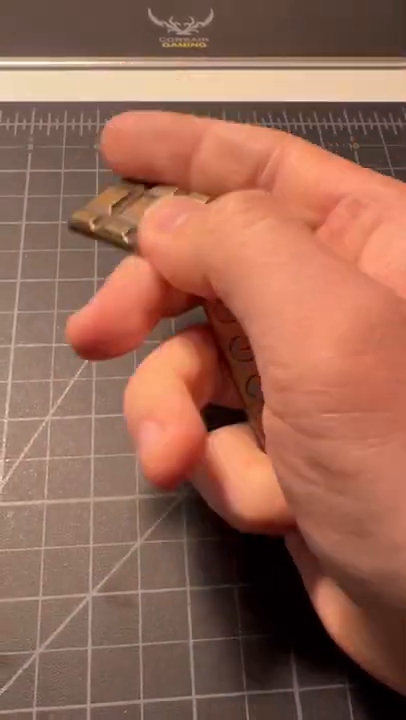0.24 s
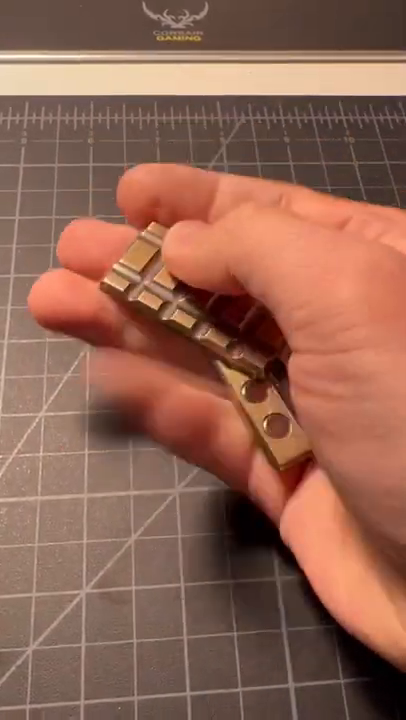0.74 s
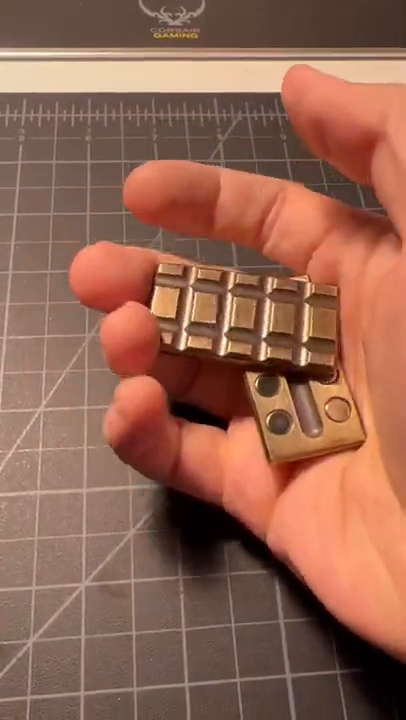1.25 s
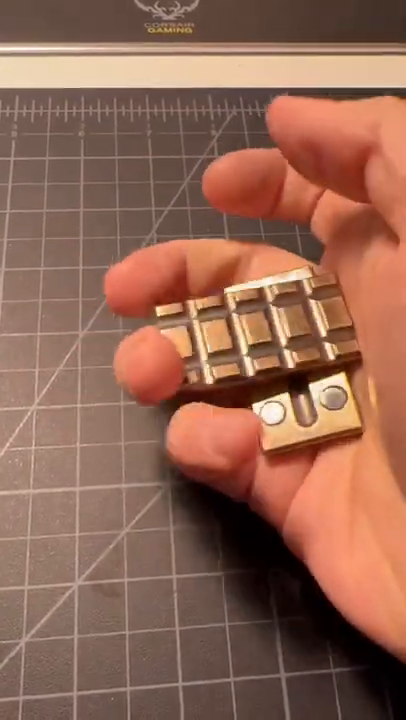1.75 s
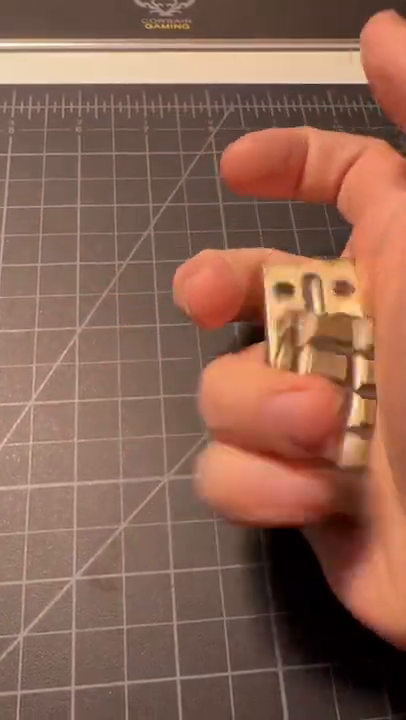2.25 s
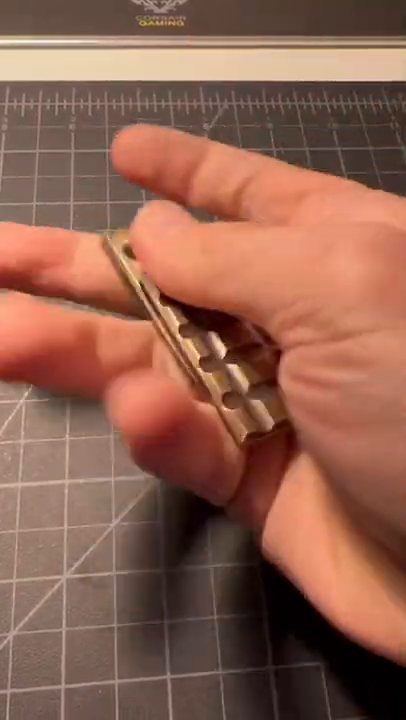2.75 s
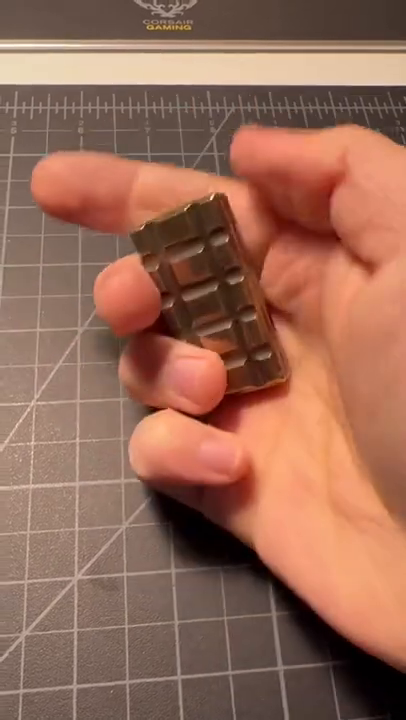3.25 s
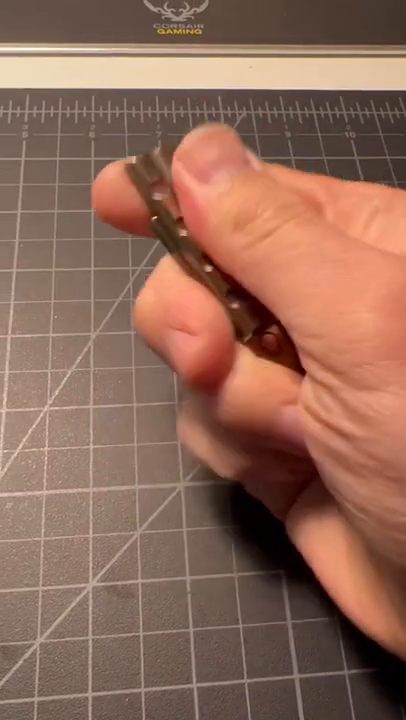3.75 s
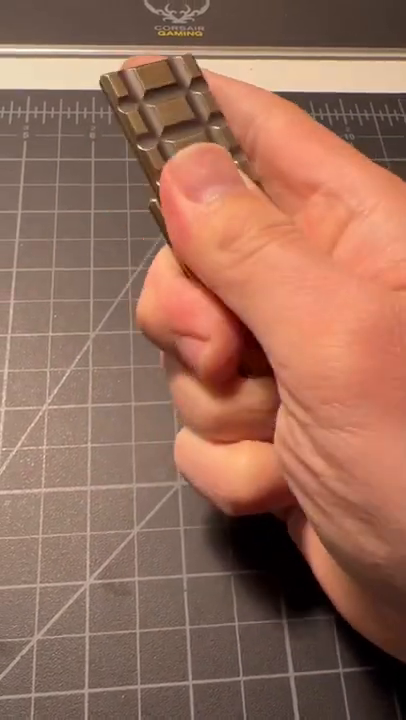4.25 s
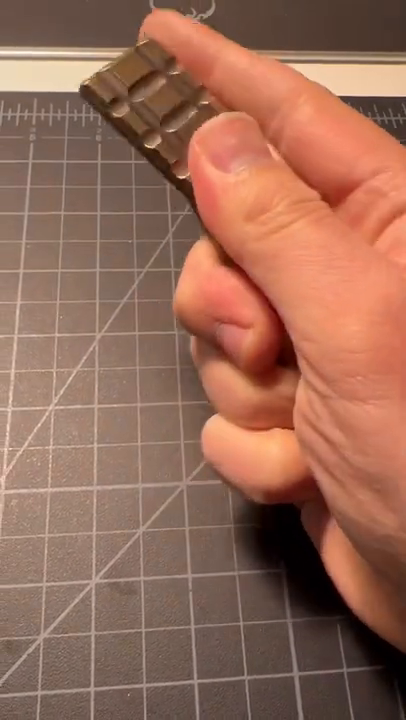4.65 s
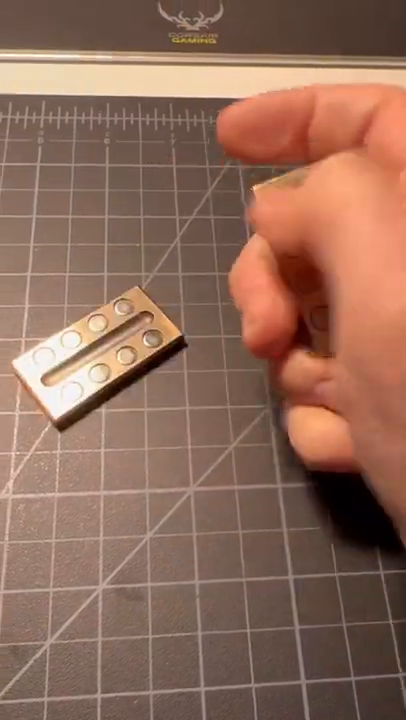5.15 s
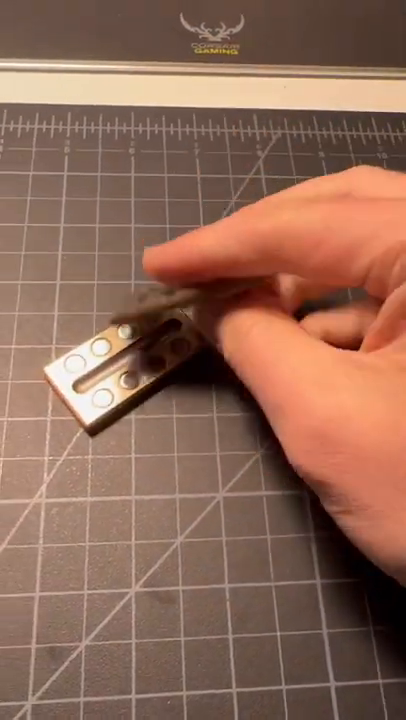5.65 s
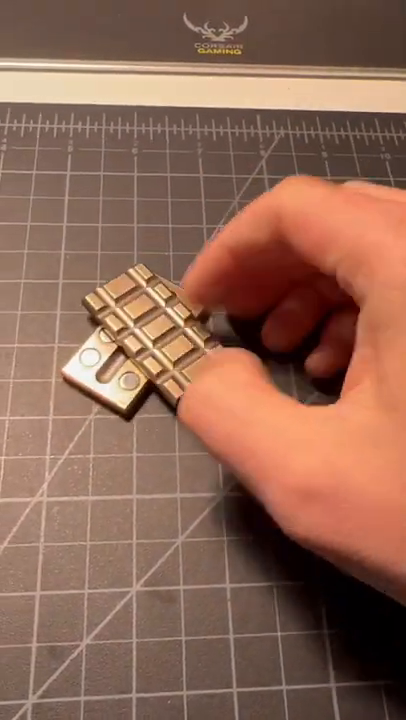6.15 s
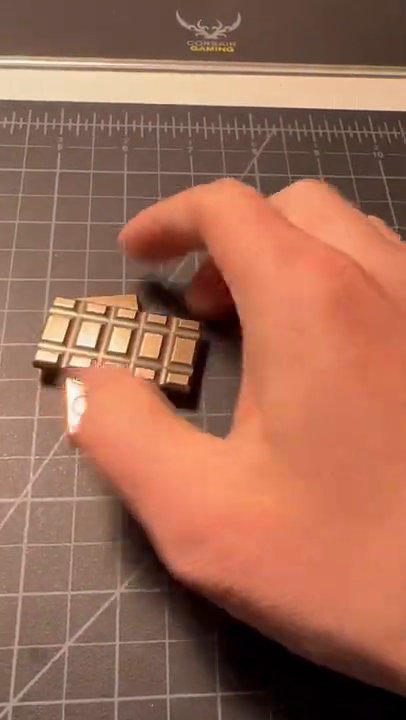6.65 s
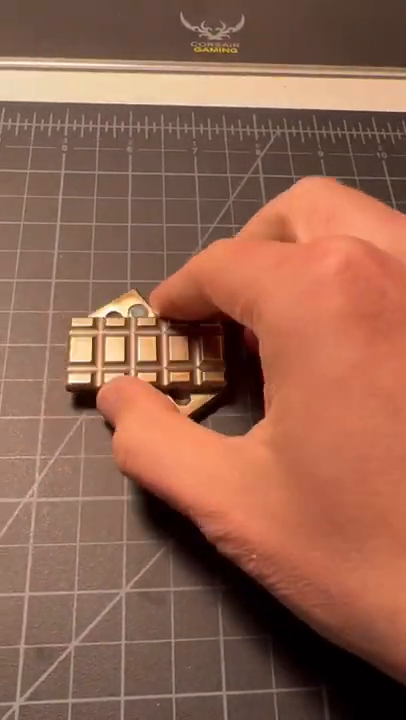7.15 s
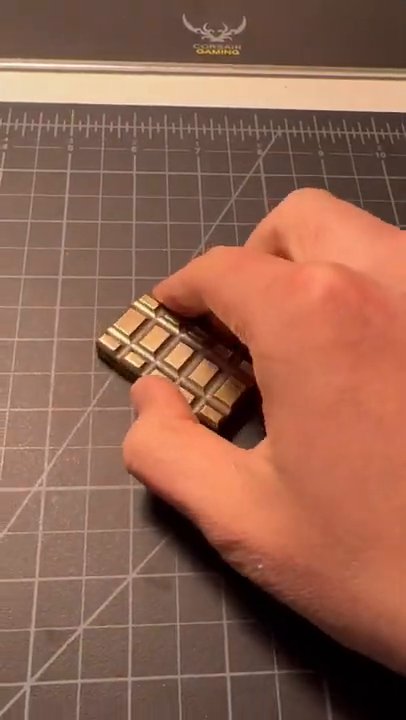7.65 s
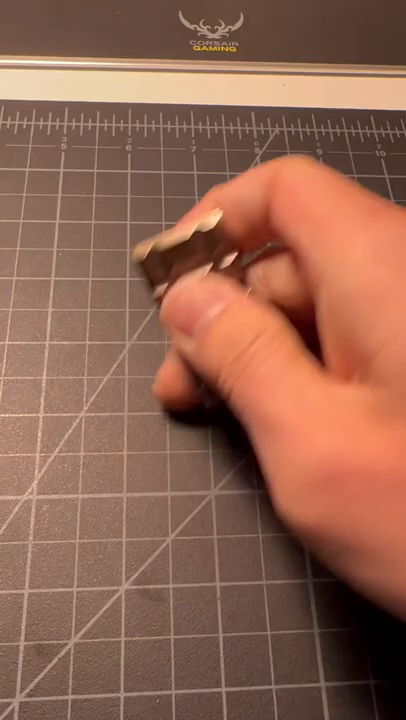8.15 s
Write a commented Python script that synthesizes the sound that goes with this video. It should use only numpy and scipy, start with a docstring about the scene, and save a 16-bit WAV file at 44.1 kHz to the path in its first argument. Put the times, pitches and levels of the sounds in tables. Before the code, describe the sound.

Crisp metallic clicks of a magnetic slider toy, a ringing drop onto a matted desk, soft rubbing and more hard snaps in a quiet room.

```python
"""In a quiet room, above a desk, a hand slides two small metal plates studded with magnets over each other.
They snap from magnet to magnet: noisy cracks excite ringing plate modes; short scrapes hiss, edges squeak.
One falls on the desk mat, bounces and is pushed together with the other there; blows ring desk modes.
Skin, mat and arm are coloured noise in uneven strokes, over a hush and a low drone.
A close pair of microphones with a limiter listens."""
import sys
import numpy as np
from scipy import signal
from scipy.fft import rfft, irfft, next_fast_len
from scipy.io import wavfile
from scipy.ndimage import uniform_filter1d

SR = 44100
rng = np.random.default_rng(int(sys.argv[2]) if len(sys.argv) > 2 else 0)


def bounce(signal):
    """Save signal as a 16-bit WAV file at the path given by the first command-line argument."""
    frames = np.transpose(np.atleast_2d(signal))
    limited = np.clip(frames, -1, 1)
    pcm = np.round(limited * 32767).astype(np.int16)
    wavfile.write(sys.argv[1], SR, pcm)


def invert_db(level):
    """Linear amplitude ratio for a level in decibels (20 dB per decade), elementwise."""
    return 10 ** (np.asarray(level, dtype=float) / 20)


N = 370440

# The still room. Each row: frequency in Hz, relative density in dB per Hz.
HUSH_COLOUR = [(88, -32), (150, -9), (177, -23.5), (275, -24), (512, -32), (551, -30), (872, -37.5),
               (1480, -43.5), (2400, -32), (3500, -40.5), (9000, -36), (12000, -50.5), (15600, -68.5),
               (22000, -120)]
HUSH_DB = -77.5
# Stereo width of hush and drone. Each row: frequency in Hz, left-right likeness from -1 to 1.
HUSH_LIKENESS = [(60, 0.99), (240, -0.13), (950, -0.71), (3770, -0.87), (15000, .3)]

# A low drone from beyond the room swells and fades. Each row: time in seconds, level in dB.
DRONE_LEVEL = [(0, -95), (.5, -72), (1.352, -71), (1.799, -81), (3.399, -91), (4.8, -81.5), (6, -76),
               (7.8, -74.5), (8.4, -85)]
# Colour of the drone. Each row: frequency in Hz, relative density in dB per Hz.
DRONE_COLOUR = [(160, -29.5), (230, -3), (340, -2), (450, -15), (600, -30), (900, -13), (1300, -29.5),
                (2500, -87.5)]

# Hand and toy rub along; from 3.4 to 4.1 s the background hiss faintly rises and falls.
# Each row: start in seconds, end in seconds, skin or hiss drive in dB, mat drive in dB.
STROKES = [(0.03, 0.254, -81.5, -100), (0.65, 0.882, -73, -79.5), (1.237, 1.425, -67.5, -70.5),
           (1.46, 1.527, -80.5, -83.5), (2.425, 2.505, -69.5, -89), (2.512, 2.733, -68.5, -80),
           (2.754, 2.889, -75, -85), (2.89, 3.009, -66.5, -76.5), (2.988, 3.294, -75, -87),
           (3.292, 3.515, -74.5, -96), (3.408, 4.1, -81, -99), (3.633, 3.718, -77.5, -90),
           (3.705, 3.86, -84.5, -83), (4.173, 4.248, -76.5, -99), (4.932, 4.985, -64, -69.5),
           (5.207, 5.584, -81, -75), (5.492, 5.566, -80, -77), (6.121, 6.326, -76.5, -64),
           (6.366, 6.555, -61.5, -51), (6.564, 6.67, -74.5, -66.5), (6.696, 6.866, -64.5, -50.5),
           (7.011, 7.145, -69.5, -58), (7.083, 7.387, -76, -57.5), (7.428, 7.659, -66, -57),
           (7.704, 7.78, -67, -49), (7.843, 7.918, -68, -36), (7.897, 8.011, -89, -72),
           (8.042, 8.304, -57.5, -64.5)]
# Rumble of the arm through the desk, before its flicker. Each row: time in seconds, level in dB.
ARM_LEVEL = [(0.0, -71.5), (2.132, -73), (2.291, -64.5), (3.41, -77), (3.81, -55), (4.58, -71.5),
             (5.12, -53), (5.398, -65.5), (7.948, -56), (8.4, -68)]
# Colours of skin, mat and arm. Each row: frequency in Hz, relative density in dB per Hz.
SKIN_COLOUR = [(880, -33.5), (1500, -6.5), (2560, 0.5), (3090, -9.5), (7240, -6), (8920, 1), (11400, -15.5),
               (16000, -27.5)]
MAT_COLOUR = [(120, -18), (200, -1.5), (923, -8), (1080, -7.5), (1690, -4), (2810, -18), (3630, -14.5),
              (7300, -23), (10300, -33), (11700, -61.5), (19800, -120)]
ARM_COLOUR = [(15, -30.5), (25, -11), (76, 8), (144, 3.5), (193, -15.5), (250, -20), (320, -42),
              (550, -120)]

# Plate strikes plate; the low-coloured row at 7.9065 s is the short knock of a desk thump.
# Each row: time in seconds, crack peak in dB, crack colour in Hz, ring drive in dB, loss per rebound in dB.
SNAPS = [(0.2828, -15.5, 5790, -15, 21.5), (0.4511, -9.5, 6760, -10.5, 14.5),
         (0.4716, -9.5, 6370, -16, 15.5), (0.4906, -11.5, 6960, -18, 9.5), (0.5338, -3.5, 5550, -16, 6.5),
         (1.0269, 0.5, 5410, -18, 9), (1.295, -44, 8400, 9, 13), (1.3261, -42.5, 6420, -25, 22),
         (1.658, -28.5, 5600, -6.5, 6.5), (1.7828, -34.5, 6400, -12.5, 22.5),
         (1.8282, -2.5, 5960, -8.5, 10.5), (1.846, -14.5, 5600, -14, 15.5), (2.081, -58, 5030, -35, 28),
         (2.2088, -3.5, 5510, -9, 4), (2.2318, -9, 5200, -17.5, 10.5), (2.9117, -28.5, 4050, -34.5, 25),
         (2.915, -40.5, 1260, -35, 13), (2.923, -30, 9450, -32, 8), (2.934, -43, 1350, -35, 26),
         (3.0076, -39, 9820, -24, 27), (3.658, -41.5, 2300, -26, 7), (3.7501, -42, 6450, -31, 9),
         (3.783, -49, 2263, -13, 38), (4.2101, -36.5, 5733, -24, 11.5), (4.778, -41.5, 5260, -2, 28),
         (4.803, -32, 4900, -6, 23.5), (4.8295, -30, 4930, -11.5, 6.5), (4.9517, -4, 2050, -42.5, 21),
         (4.999, -35, 5470, -6.5, 27.5), (5.034, -30, 5200, -7, 23.5), (5.0525, -1, 5160, -23, 36.5),
         (5.0592, -4.5, 4580, -13.5, 33), (5.0721, -17, 5150, -8.5, 29.5), (5.0929, -18.5, 5305, -11, 13.5),
         (5.6445, -9.5, 10230, -6.5, 23.5), (5.6538, -11.5, 9700, -10, 15), (5.661, -15.5, 5370, -12, 6),
         (5.682, -7.5, 5570, -12.5, 8.5), (5.7136, -23.5, 6600, -16, 21), (5.733, -30, 3300, -17, 10.5),
         (5.756, -41, 4000, -10, 15.5), (5.89, -33.5, 7350, -8, 14), (5.9, -32, 6900, -9, 9),
         (5.92, -30.5, 4750, -14, 15), (5.935, -3, 5770, -16.5, 24.5), (5.971, -2.5, 5980, -16.5, 19.5),
         (6.0073, -38.5, 5810, -5.5, 24.5), (6.8142, -6, 7920, -33, 13.5), (6.814, -4.5, 9000, -39.5, 11.5),
         (7.3529, -6, 8930, -29, 31), (7.3746, -0.5, 5380, -8, 6), (7.79, -54, 7250, -23, 6.5),
         (7.9065, -29.5, 1454, -40, 35.5)]
# Nominal pitches of the plate modes in Hz, one per mode.
PLATE_HZ = [3650, 5275, 5348, 5620, 6500, 7470, 12060, 12250, 14050, 14290]
# The same modes ringing freely. Each row: relative level in dB, t60 in seconds.
PLATE_RING = [(-8, 0.07), (-4, 0.075), (-34, 0.33), (-10, 0.1), (-14, 0.07), (-14.5, .05), (-9, 0.033),
              (-13, 0.092), (-12.5, 0.065), (-10.5, 0.075)]
REBOUND_S = 0.0063    # greatest average spacing of the rebounds, counted from the first contact
LET_GO_S = 4.7                           # until then the fingers damp both plates
HELD_DECAY, HELD_SCATTER = 0.45, 0.02    # in the hand: share of the free decay time, scatter of pitch
APART_FROM_S, APART_TO_S = 4.76, 5.5     # the plates are apart
APART_HIGH_DB = 7                        # then the upper modes ring freely,
APART_LONGER, APART_SING_DB = 2, 17      # low bending modes last longer and the longest one sings out
# Lower modes far from the crack colour are hardly struck: loss per octave, greatest loss.
OFF_COLOUR_DB_PER_OCTAVE, OFF_COLOUR_MOST_DB = 55, 16
# Upper modes: base level, dB per dB of crack peak, dB per dB of ring drive.
HIGH_RING_DB, HIGH_RING_PER_DB, HIGH_RING_SHARE = -3, 0.5, 0.61

ROOM_T60_S, ROOM_DB, WALL_CUT_HZ = 0.37, -23, 6800   # t60 in the bass, send level, dulling per round

# Short scrapes with gliding resonances: metal on metal, and at 7.83 s a plate scuffing the mat.
# Each row: start in seconds, end in seconds, level in dB, first resonance at the start in Hz, at the end in Hz.
SCRAPES = [(0.335, 0.38, -53.5, 2780, 2838), (0.41, 0.476, -62.5, 2880, 2900),
           (1.011, 1.059, -36.5, 2780, 2640), (1.334, 1.412, -76, 6600, 6300),
           (2.134, 2.215, -70.5, 4070, 3255), (2.912, 2.97, -58, 4170, 2610),
           (4.664, 4.804, -55, 4090, 2910), (4.812, 4.857, -43.5, 3630, 3640),
           (7.826, 7.892, -38.5, 1295, 1550)]
SCRAPE_SECOND, SCRAPE_THIRD, SCRAPE_WIDTH = 1.55, 2.3, 0.07   # upper resonances, bandwidth, against the first

# The toy slaps palm and fingers. Each row: time in seconds, blow level in dB,
# knock hardness in dB, deep thud drive in dB.
SLAPS = [(1.02, -29.5, -6.5, -13), (1.809, -30, -12.5, -5), (1.831, -28, -7, -16), (1.844, -15, -3, -31.5),
         (2.215, -22, -9, -8), (2.27, -35, -29, -24)]
# Arm and toy thump the desk. Each row: time in seconds, blow level in dB,
# knock hardness in dB, deep thud drive in dB.
THUMPS = [(2.32, -79, -47, 14), (2.436, -36, -32.5, -4), (2.915, -63.5, -21, -18), (3.661, -51, -11, 17.5),
          (3.77, -60, -5, 25), (3.993, -67.5, -33, 28), (4.228, -60.5, -44.5, 33.5), (4.952, -9.5, 6, -12),
          (4.965, -7, -16.5, -35), (5.034, -25.5, -8, -26.5), (5.052, -23, 13.5, -28),
          (5.06, -13.5, -4.5, -30.5), (5.071, -21.5, 2, -29.5), (5.093, -16, -5, -34), (5.645, -30, 0, -30),
          (5.667, -18, -0.5, -49), (5.685, -20, -0.5, -43), (5.89, -27, -13, -27),
          (5.933, -20, -6.5, -26.5), (5.957, -27, 4, -42.5), (5.971, -15.5, -3.5, -34),
          (6.006, -18, -6, -45), (6.273, -55.5, -50, -6), (6.7, -43.5, -41, -12), (6.817, -22, 2, -47.5),
          (6.835, -21, -8.5, -28.5), (7.352, -21.5, 5, -26), (7.383, -19, 1, -5.5), (7.52, -34.5, -6, -3.5),
          (7.722, -43.5, -2.5, -29), (7.868, -26, -9.5, -30.5), (7.906, -17, -7, -21.5),
          (8.328, -67.5, -39, 9.5)]
# Modes of the desk top. Each row: nominal pitch in Hz, relative level in dB, nominal t60 in seconds.
DESK_MODES = [(128.37, -1.5, 0.28), (233, -5.5, 0.14), (288, -9, 0.1), (412, -11, 0.12), (540, -12.5, 0.03),
              (790, -6.5, 0.0083), (960, -16, 0.07), (1390, -13, 0.05), (1720, -14, 0.035)]

# A plate edge catches and squeaks. Each row: start in seconds, end in seconds, level in dB, pitch in Hz,
# drive of the first partial against the second in dB.
SQUEAKS = [(1.32, 1.337, -41.5, 3274, -38), (1.653, 1.683, -37.5, 3277, -28.5),
           (1.774, 1.804, -42, 3330, -7), (2.19, 2.213, -33, 2670, -26.5), (2.857, 2.887, -49, 4090, -4)]
SQUEAK_WIDTH_HZ = 330            # blur of the first partial
SQUEAK_UPPER_DB = (-19.5, -28.5)  # drive of third and fourth partial against the second

LEFT_LAG_SAMPLES, LEFT_DB = 1, 0.2
MIC_TOP_HZ = 15400
LIMIT_DB, RELEASE_DB_PER_S = -3.5, 700


def rms_one(x):
    """Scale to unit power."""
    return x / np.sqrt(np.mean(x ** 2) + 1e-20)


def cut(x, hz, kind, order=2):
    """Butterworth low- or high-pass."""
    return signal.sosfilt(signal.butter(order, np.clip(hz, 20, 20000), kind, fs=SR, output="sos"), x)


def at_hz(points, hz):
    """Read a spectrum on a log-frequency axis."""
    points_hz, values = np.transpose(points)
    return np.interp(np.log(hz), np.log(points_hz + 1), values)


def follow(points):
    """Draw a level in dB through (seconds, dB) points."""
    return np.interp(np.arange(N) / SR, *np.transpose(points))


def flicker(rate):
    """Random drift: straight lines between normal draws of spread 1, rate draws per second."""
    knots = rng.standard_normal(N // 64)
    return np.interp(np.arange(N) / SR * rate, np.arange(len(knots)), knots)


def coloured(spectrum, likeness, grain_db):
    """Stereo noise of a given colour and width; a drifting level makes it grainy; rms 1."""
    hz = np.arange(N // 2 + 1) * SR / N + 1
    grains = rng.standard_normal((2, N)) * invert_db(grain_db * flicker(450))
    mid, side = rfft(grains) * invert_db(at_hz(spectrum, hz))
    alike = np.clip(at_hz(likeness, hz), -1, 1)
    left_right = np.sqrt(1 + alike) * mid + np.sqrt(1 - alike) * side * [[1], [-1]]
    return rms_one(irfft(left_right, N))


def resonance(hz, width_hz):
    """Two-pole band-pass with gain 1 on top."""
    r = np.exp(-np.pi * width_hz / SR)
    return (1 - r * r) / 2 * np.array([1, 0, -1]), [1, -2 * r * np.cos(2 * np.pi * hz / SR), r * r]


def ringing(modes, gains_db, t):
    """Dying sines, one for each mode, with t60 kept between 0.01 and 0.4 s."""
    hz, level_db, t60 = np.transpose(modes)[:, :, None]
    fall_db = 60 * t / np.clip(t60, 0.01, 0.4)
    return (invert_db(level_db + gains_db[:, None] - fall_db) * np.sin(2 * np.pi * hz * t)).sum(axis=0)


def add(out, s, sound):
    """Mix a sound in at a time."""
    i = round(s * SR)
    out[i:i + len(sound)] += sound[:N - i]


def hush():
    """The still room is steady, faintly grainy coloured noise."""
    return invert_db(HUSH_DB) * coloured(HUSH_COLOUR, HUSH_LIKENESS, grain_db=3.5)


def drone():
    """Diffuse low noise on its slow swell."""
    return invert_db(follow(DRONE_LEVEL)) * coloured(DRONE_COLOUR, HUSH_LIKENESS, grain_db=2.0)


def rubbing(spill=0.043):
    """Each row swells and fades; skin hisses high, the mat scrapes lower and grittier, the arm rumbles."""
    skin, mat = np.zeros(N), np.zeros(N)
    for start, end, skin_db, mat_db in STROKES:
        start = max(start - spill, 0)  # rows spill over both ends, in seconds
        swell = np.hanning(round((end + spill - start) * SR))
        add(skin, start, invert_db(skin_db) * swell)
        add(mat, start, invert_db(mat_db) * swell)
    skin = skin * invert_db(2.0 * flicker(35)) * coloured(SKIN_COLOUR, [(3000, 0.85), (9000, 0.49)], grain_db=2.5)
    grit = coloured(MAT_COLOUR, [(500, 0.9), (5000, 0.91)], grain_db=0.5)
    lumps = invert_db(4.1 * flicker(70)) * cut(grit, 2900, "low")
    hiss = invert_db(5.1 * flicker(17)) * cut(grit, 2000, "high")
    rumble = coloured(ARM_COLOUR, [(50, 1), (300, 1.0)], grain_db=-0.5)
    arm = invert_db(follow(ARM_LEVEL) + 2.8 * flicker(9.7)) * rumble
    return skin + mat * (lumps + hiss) + arm


def plate_contacts(t, apart):
    """Tiny uneven touches burst within a few ms, over a longer faint rattle."""
    ms = t * 1000
    fade = np.exp(-ms / (1.0 if apart else 2.6)) + invert_db(-22) * np.exp(-ms / 25)
    fade = fade * (1 - np.exp(-ms / 0.067))  # quick rise
    return rng.standard_normal(len(t)) * invert_db(-2.5 * rng.standard_normal(len(t))) * fade


def plate_crack(contacts, crack_hz, t):
    """The contacts radiate a broad crack around its colour; peak 1."""
    crack = signal.lfilter(*resonance(crack_hz, 2.0 * crack_hz), contacts) + invert_db(-6) * contacts
    crack += invert_db(13.0) * signal.lfilter(*resonance(crack_hz, 420), contacts)  # the spot struck rings briefly
    first_touch = invert_db(-8) * crack * np.exp(-t / 0.00014)
    crack = cut(crack, 12000, "low", order=3) + first_touch  # only the first touch is bright
    crack = cut(crack, 0.5 * crack_hz + 300, "high", order=3)  # small plates radiate no bass
    return crack / np.abs(crack).max()


def plate_ring(contacts, crack_hz, first_db, ring_db, held, apart, t):
    """The contacts push the plate modes, which ring on, damped by the hand and buzzing where plates touch."""
    nominal_hz = np.array(PLATE_HZ)
    high = nominal_hz > 11000
    bending = np.abs(nominal_hz - 5400) < 300  # these long modes hold their pitch
    clear = bending | high  # these buzz less

    octaves_off = np.abs(np.log2(nominal_hz / crack_hz))
    low_db = ring_db - np.minimum(OFF_COLOUR_DB_PER_OCTAVE * octaves_off, OFF_COLOUR_MOST_DB)
    high_db = HIGH_RING_DB + apart * APART_HIGH_DB + HIGH_RING_PER_DB * first_db + HIGH_RING_SHARE * ring_db
    strengths = np.where(high, high_db, low_db) + 3 * rng.standard_normal(len(high))

    # fingers and magnets load the plates anew each time
    scatter = np.where(bending, 0.006 if held else 0.002, np.where(held & ~high, HELD_SCATTER, 0.012))
    detuned = nominal_hz * (1 + scatter * rng.standard_normal(len(high)))
    modes = np.column_stack([detuned, PLATE_RING])
    bending_decay = np.where(apart & (detuned < 5500), APART_LONGER, 1)
    modes[:, 2] *= np.where(bending, bending_decay, HELD_DECAY if held else 1)
    modes[:, 1] += apart * APART_SING_DB * (modes[:, 2] > 0.3)

    buzz_db = 6 if held else 0 if apart else 3
    buzz = invert_db(buzz_db * np.interp(t * 700, np.arange(250), rng.standard_normal(250)))  # 700 draws per second
    ring = buzz * ringing(modes[~clear], strengths[~clear], t)
    ring = ring + np.sqrt(buzz) * ringing(modes[clear], strengths[clear], t)
    push = contacts / np.sqrt(np.sum(contacts ** 2))
    return signal.fftconvolve(push, ring)


def snaps():
    """Each row is a first contact and three ever weaker rebounds, all cracking and ringing."""
    out, t = np.zeros(N), np.arange(SR // 3) / SR
    crack_t = t[:4096]
    for first, first_db, crack_hz, ring_db, loss_db in SNAPS:
        held, apart = first < LET_GO_S, APART_FROM_S < first < APART_TO_S
        times = first + REBOUND_S * np.arange(4) * rng.uniform(0.79, 1.0, 4)
        for k, s in enumerate(times):
            peak = invert_db(first_db - k * abs(loss_db))
            contacts = plate_contacts(crack_t, apart)
            add(out, s, peak * plate_crack(contacts, crack_hz, crack_t))
            add(out, s, peak * plate_ring(contacts, crack_hz, first_db, ring_db, held, apart, t))
    return out


def room(x):
    """Ten feedback delays a side, duller on every round, and three diffusers."""
    size = next_fast_len(N + SR)
    w = 2 * np.pi * np.arange(size // 2 + 1) / size
    wall = 1 / np.sqrt(1 + (w * SR / (2 * np.pi * WALL_CUT_HZ)) ** 2)
    out = []
    for lags, smears in zip(rng.uniform(0.015, 0.04, (2, 10)), rng.uniform(0.0011, 0.005, (2, 3))):
        echo = 0
        for k, d in enumerate(lags):
            one_round = wall * invert_db(-60 * d / ROOM_T60_S) * np.exp(-1j * w * round(d * SR))
            echo = echo + (-1) ** k / (1 / one_round - 1)  # sum of all its rounds
        for d in smears:
            z = np.exp(-1j * w * round(d * SR))
            echo = echo * (z - 0.6) / (1 - 0.27 * z)
        out.append(irfft(rfft(x, size) * echo, size)[:N])
    mid = (out[0] + out[1]) / 2
    side = cut((out[0] - out[1]) / 2, 600, "high")  # close ports hear long waves alike
    return np.array([mid + side, mid - side])


def scrapes():
    """Friction hiss through three resonances that glide in pitch together; it fades in and out."""
    out = np.zeros(N)
    for start, end, level_db, from_hz, to_hz in SCRAPES:
        first_hz = np.linspace(from_hz, to_hz, round((end - start) * SR))
        width_hz = SCRAPE_WIDTH * first_hz.mean()
        hiss, sound = rng.standard_normal(len(first_hz)), np.zeros(len(first_hz))
        for times, gain_db in ((1, 0), (SCRAPE_SECOND, -8), (SCRAPE_THIRD, -7)):
            state = np.zeros(2)
            for i in range(0, len(hiss), 128):  # retune every 128 samples
                band = resonance(times * first_hz[i], width_hz)
                part, state = signal.lfilter(*band, hiss[i:i + 128], zi=state)
                sound[i:i + 128] += invert_db(gain_db) * part
        sound = rms_one(cut(sound, min(11000, 3 * from_hz), "low", order=4))
        add(out, start, sound * invert_db(level_db) * signal.windows.tukey(len(hiss), 0.67))
    return out


def blows(rows, ring_db, thud_t60, push_ms=20.0, knock_ms=3.34):
    """A dull push, a hard knock and a deep thud; low modes ring most after soft blows, upper after hard."""
    out, t = np.zeros(N), np.arange(SR // 2) / SR
    upper = np.array(DESK_MODES)[:, 0] > 350
    for s, level_db, knock_db, deep_db in rows:
        push = rng.standard_normal(len(t)) * np.exp(-t * 1000 / push_ms)
        push = cut(cut(push, 270, "low"), 87, "high")
        knock = rng.standard_normal(len(t)) * np.exp(-t * 1000 / knock_ms)
        knock = cut(cut(knock, 2100, "low", order=4), 400, "high")
        modes = np.array(DESK_MODES, float)
        modes[:, 0] *= 1 + 0.013 * rng.standard_normal(len(modes))  # each spot sounds a little different
        gains_db = ring_db - 0.49 * knock_db + upper * (knock_db + 12.5) + 3.5 * rng.standard_normal(len(modes))
        top = ringing(modes, gains_db, t) * (1 - np.exp(-t / 0.0016))
        thud = ringing([(60, 6, thud_t60)], np.array([deep_db]), t)
        thud = thud * (1 - np.exp(-t / 0.013))  # the mass gives way slowly
        blow = invert_db(-6) * push / np.abs(push).max() + top + thud + invert_db(knock_db + 12.0) * knock
        add(out, s, invert_db(level_db) * blow)
    return out


def slaps():
    """Toy against palm and fingers: a shorter push and a much fainter ring."""
    return blows(SLAPS, ring_db=-28.5, thud_t60=0.16, push_ms=5.2, knock_ms=5.4)


def squeaks():
    """Unsteady stick-slip: four blurred partials in a short burst."""
    out = np.zeros(N)
    for start, end, level_db, hz, first_db in SQUEAKS:
        slips, sound = rng.standard_normal(round((end - start) * SR)), 0
        grains_db = 5.0 * np.repeat(rng.standard_normal(len(slips) // 64 + 1), 64)[:len(slips)]
        slips = slips * invert_db(grains_db)
        for k, gain_db in enumerate((first_db, 0, *SQUEAK_UPPER_DB)):
            blur = resonance((k + 1) * hz, SQUEAK_WIDTH_HZ * np.sqrt(k + 1))
            sound = sound + invert_db(gain_db) * signal.lfilter(*blur, signal.lfilter(*blur, slips))
        sound = sound + invert_db(-30) * cut(slips, hz / 2, "high")  # a little hiss
        add(out, start, invert_db(level_db) * rms_one(sound) * signal.windows.tukey(len(slips), 0.21))
    return out


def thumps():
    """Arm and toy against the desk, whose top rings."""
    return blows(THUMPS, ring_db=-14, thud_t60=0.12)


def scene():
    """The left port hears the toy a touch later and louder; slaps in the hand hardly reach the walls."""
    loud = snaps() + scrapes() + squeaks() + thumps()
    in_hand = slaps()
    toy = loud + in_hand
    lag = np.exp(-1j * np.linspace(0, np.pi, N // 2 + 1) * LEFT_LAG_SAMPLES)
    direct = np.array([invert_db(LEFT_DB) * irfft(rfft(toy) * lag, N), toy])
    echoes = invert_db(ROOM_DB) * room(loud + invert_db(-26.5) * in_hand)
    return direct + echoes + rubbing() + drone() + hush()


def top_cut(x):
    """Nothing passes above the cut-off."""
    return signal.sosfilt(signal.butter(12, 16970, fs=SR, output="sos"), x)


def record(dry):
    """The microphones lose the top; a limiter holds the peaks and lets go at a steady rate."""
    dry = cut(dry, MIC_TOP_HZ, "low", order=12)
    over_db = np.maximum(20 * np.log10(np.abs(dry).max(axis=0) + 1e-9) - LIMIT_DB, 0)
    ramp = RELEASE_DB_PER_S * np.arange(N) / SR
    held_db = np.maximum(np.maximum.accumulate(over_db + ramp) - ramp, 0)
    mix = dry * invert_db(-uniform_filter1d(held_db, size=32))
    return top_cut(mix)


dry = scene()
out = record(dry)
bounce(out)
```